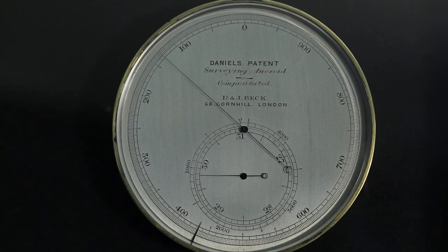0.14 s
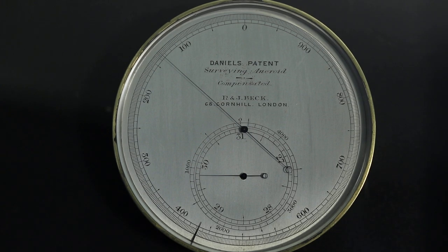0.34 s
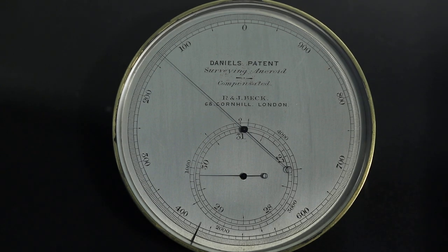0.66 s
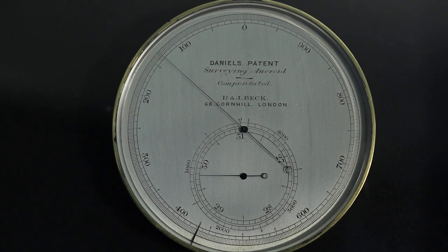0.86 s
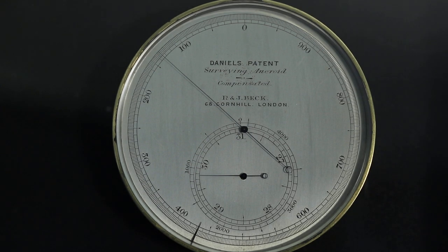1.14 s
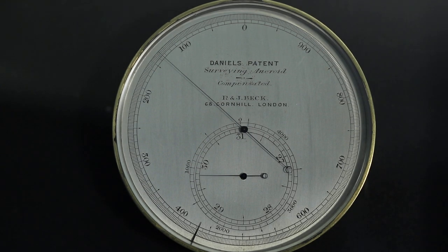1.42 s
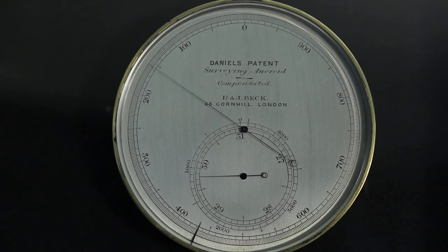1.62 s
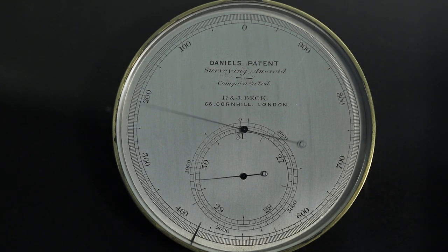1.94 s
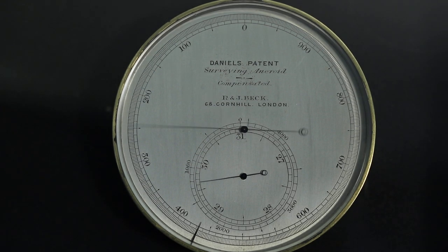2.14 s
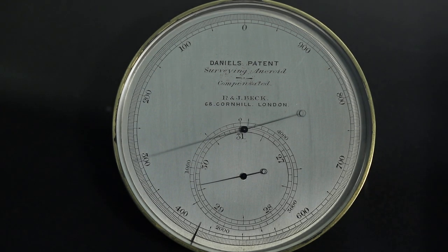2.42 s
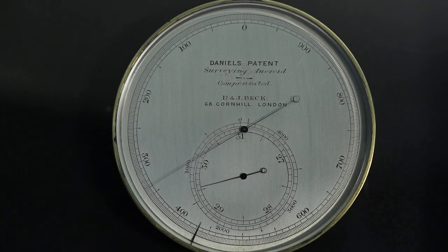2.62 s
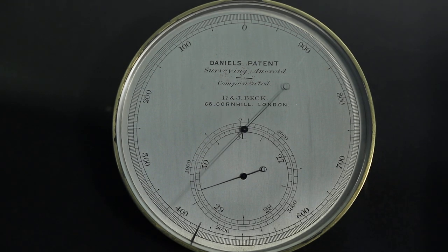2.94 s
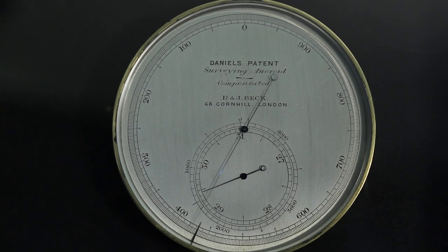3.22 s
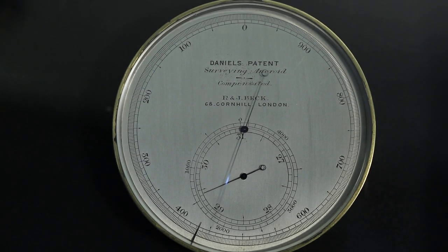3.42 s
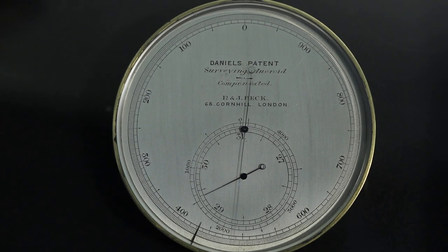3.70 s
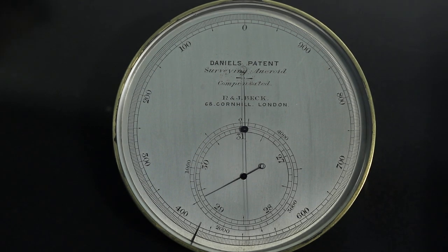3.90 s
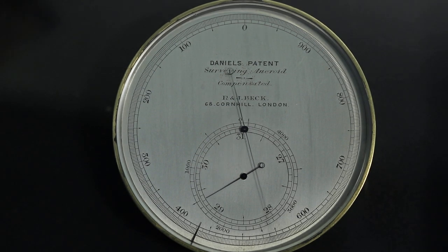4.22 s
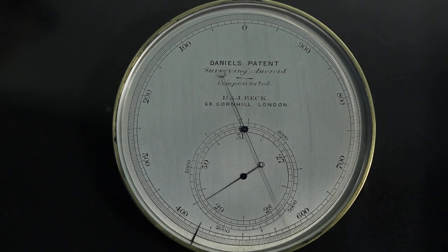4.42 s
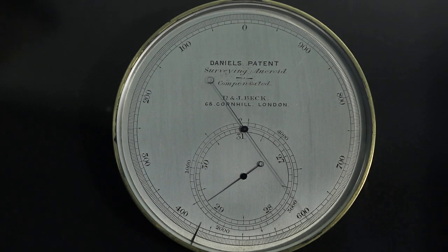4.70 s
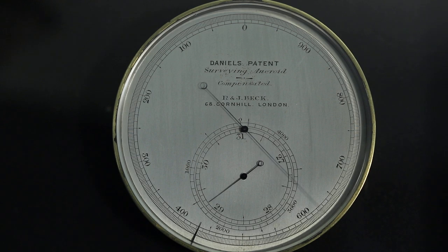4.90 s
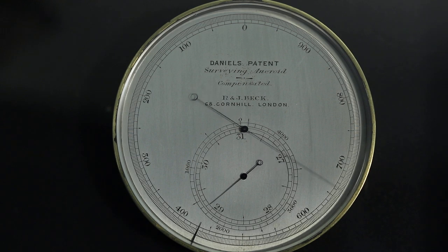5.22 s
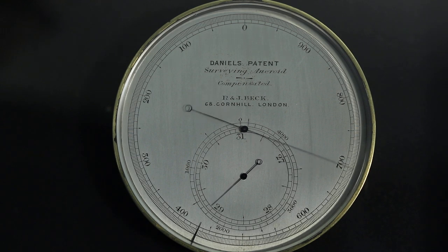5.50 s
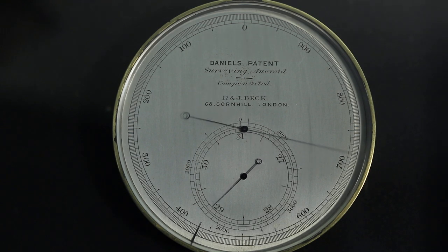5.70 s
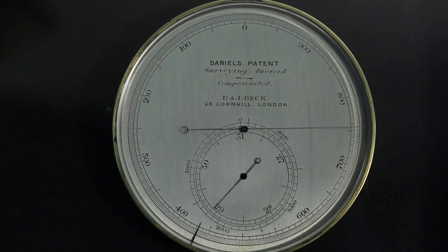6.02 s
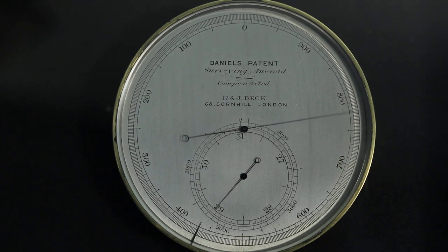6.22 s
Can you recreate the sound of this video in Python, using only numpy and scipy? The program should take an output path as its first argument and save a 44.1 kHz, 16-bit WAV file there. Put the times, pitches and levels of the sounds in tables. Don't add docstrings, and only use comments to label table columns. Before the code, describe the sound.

Near silence with soft room hiss, a tiny bright tick, then a faint dull knock. A very loud switch snap with a low thump starts a small electric vacuum pump close by. Its pitch sweeps up rapidly, rough and rattly, within about a second, then holds a hard, buzzing whine with airy rush until the end. Close stereo microphones in a small, lightly reverberant room.

```python
import sys
import numpy as np
from scipy import signal
from scipy.fft import irfft
from scipy.io import wavfile
from scipy.ndimage import uniform_filter1d

SR = 44100
rng = np.random.default_rng(int(sys.argv[2]) if len(sys.argv) > 2 else 0)


def level_to_linear(level):
    exponent = np.asarray(level, float) / 20
    return 10 ** exponent


def materialize(psi):
    bounded = np.clip(np.atleast_2d(psi).T, -1, 1)
    quanta = np.round(bounded * 32767).astype(np.int16)
    wavfile.write(sys.argv[1], SR, quanta)


N = 280035

# shaft order, multiple of the mains pulsation,
# left level/dB, right level/dB, left lead/rad
LOW_TONES = [(1, 0, -52, -53, 0.1), (0, 1, -48, -48, 0.1), (2, 0, -64, -64, 0.0), (1, 1, -53, -55, 0.2),
             (0, 2, -53, -55, 0.2), (4, 0, -29, -32, 0.2), (3, 1, -48, -52, 0.2), (6, -1, -49, -52, -0.2),
             (0, 5, -47, -50, 0.6), (7, 0, -48, -47, 1.1), (12, -4, -36, -39, 0.6), (8, 0, -23, -26, 0.1),
             (12, -3, -41, -44, 0.4), (8, 1, -49, -52, 0.4), (12, -2, -44, -42, 1.5),
             (11, -1, -45, -49, 1.2), (10, 0, -37, -42, 1.0), (12, -1, -33, -33, 1.3), (6, 0, -58, -58, 0)]
MID_TONES = [(11, 0, -48, -50, 0.2), (13, -1, -45, -45, 0.3), (12, 0, -21, -18, 0.3),
             (11, 1, -48, -53, 0.2), (13, 0, -36, -41, 1.0), (12, 1, -21, -27, 0.7), (14, 0, -45, -42, 0.6),
             (12, 2, -47, -44, -0.3), (16, 0, -31, -32, 1.2), (18, 0, -51, -49, 0.1),
             (20, 0, -40, -52, 2.1), (21, 0, -49, -62, -2.5), (24, -2, -47, -43, 2.2),
             (22, 0, -48, -56, 2.6), (24, 0, -43, -42, 2.1), (24, 1, -49, -54, 2.7), (28, 0, -36, -31, 2.1),
             (32, 0, -31, -35, 1.9)]
HIGH_TONES = [(35, 0, -48, -47, -3.0), (36, 0, -44, -45, 0.8), (37, 0, -48, -45, 2.9),
              (36, 1, -48, -54, -2.6), (40, 0, -35, -41, 0.7), (44, 0, -39, -37, -0.8),
              (47, 0, -47, -54, -2.4), (48, 0, -46, -51, 1.2), (49, 0, -45, -46, -2.6),
              (50, 0, -46, -49, -1.5), (55, 0, -47, -51, -1.6), (56, 0, -37, -34, -1.7),
              (58, 0, -47, -44, -2.3), (60, 0, -41, -41, -2.9), (64, 0, -44, -42, 2.8),
              (65, 0, -48, -56, 1.6), (71, 0, -51, -51, 1), (72, 0, -44, -49, 0.5), (127, 0, -51, -52, 1),
              (128, 0, -55, -56, 1)]
TONES = LOW_TONES + MID_TONES + HIGH_TONES
# f/Hz, bandwidth/Hz, lift/dB
HOUSING = [(450, 37, 5.5), (706, 70, 15), (1196, 20, 12), (1954, 42.4, 24.5), (3730, 210, -7.5),
           (4300, 440, 3.5), (5520, 240, 5), (11540, 310, 12)]

START = 1.438
FULL_TURNS = 91.15
LAG = 6 / SR


def pump():
    t = np.arange(round(START * SR), N) / SR
    flutter = rng.standard_normal(len(t))
    flutter = evened(uniform_filter1d(uniform_filter1d(flutter, 2500), 2500))
    speed = shaft(t) * (1 + .0001 * flutter)
    turns = np.cumsum(speed) / SR
    fade = np.clip((t - START) / 0.024, 0, 1)
    strong = ringing(tones(t, speed, turns), speed / np.median(speed))
    weak = room(comb(speed, turns))[:, :len(t)]
    sound = (strong + weak) * fade + rush(t, turns)
    return np.pad(sound, ((0, 0), (N - len(t), 0)))


def shaft(t):
    creep_from_s, creep_per_s = 4.863, .182
    # speed/(turns per s), time constant/s
    missing = [(66.93, .294), (21.2, .124)]
    since = np.maximum(t - START, 0)
    lag = sum(turns * np.exp(-since / tau) for turns, tau in missing)
    return FULL_TURNS + creep_per_s * np.maximum(t - creep_from_s, 0) - lag


def tones(t, speed, turns, wobble_db=0.45, strain_db=8, small_hz=380):
    pulsation_hz = 99.7
    ripple_db, turn_per_db = 4, .25
    shared_ripple = .9
    left_low_db, left_low_hz = 12, 950
    slow = slice(None, None, 128)
    shared, left, right = uniform_filter1d(uniform_filter1d(rng.standard_normal((3, 12000)), 18), 18)
    ripple = ripple_db * evened(np.array([shared + .8 * left, shared + .8 * right]))
    out, full = np.zeros((2, len(t))), np.median(speed)
    share = speed[slow] / full
    for order, side, left_db, right_db, lead in TONES:
        hz = order * speed[slow] + side * pulsation_hz
        full_hz = order * full + side * pulsation_hz
        high = min(order / 28, 1)
        moved = ripple[:, abs(hz).astype(int)] - ripple[:, [int(full_hz)]]
        sweeping = high * np.clip(10 * (1 - share), .2, 1)
        level = sweeping * shared_ripple * moved + path_db(hz) - path_db(full_hz)
        ahead = lead + 2 * np.pi * LAG * (hz - full_hz)
        ahead += turn_per_db * high * (moved[0] - moved[1])
        lean = [left_low_db / (1 + (f / left_low_hz) ** 4) for f in (hz, full_hz)]
        level += [[.5], [-.5]] * (lean[0] - lean[1])
        level += growth_db(order, side) * np.log10(share)
        radiated = np.clip((abs(hz) + 1) / min(full_hz, small_hz), .01, 1)
        level += 60 * np.log10(radiated) * (order > 4)
        level += 40 * np.log10(share) * (0 < order < 3)
        level += 9 * (1 - share) * (order == 0)
        wobble = evened(uniform_filter1d(rng.standard_normal((2, len(hz))), 30))
        level += wobble_db * wobble * (1 + order / 40)
        ragged = evened(uniform_filter1d(rng.standard_normal(len(hz)), 8)) * abs(1 - share)
        level += strain_db * np.minimum(ragged, .5) + [[left_db], [right_db]]
        phase = 2 * np.pi * (order * turns + side * pulsation_hz * t + rng.random())
        out[0] += np.interp(t, t[slow], level_to_linear(level[0])) * np.cos(phase + np.interp(t, t[slow], ahead))
        out[1] += np.interp(t, t[slow], level_to_linear(level[1])) * np.cos(phase)
    return np.sqrt(2) * out


def growth_db(order, side):
    slot_count, slot_order_db = 12, 37
    air_low_db, air_order_db = 55, 160
    far_side_db = 150
    if order < 3:
        return 0
    air = air_low_db + (air_order_db - air_low_db) * min(order / 28, 1)
    own = air if order % slot_count else slot_order_db
    return own + far_side_db * max(abs(side) - 1, 0)


def path_db(hz):
    # f/Hz, bandwidth/Hz, level/dB
    bench_peaks = [(352.7, 4.0, 5.5), (464.1, 72.0, 16.0), (602.8, 50.0, -9.0), (654.5, 35.0, 14.5),
                   (714.6, 102.0, 2.0), (722.4, 4.0, -16.5), (915.7, 22.0, 5.0), (1002.8, 16.0, -10.0),
                   (1071.0, 100.0, -18.0), (1082.3, 36.0, 14.0), (1125.9, 20.0, 1.5), (1158.7, 10.0, 4.5),
                   (1416.1, 64.0, 9.5), (1445.8, 12.0, -9.0)]
    shell_peaks = [(1964.4, 47.0, 9.0), (2252.6, 111.0, -12.0), (2509.6, 15.0, 8.5), (2762.4, 92.0, -12.5),
                   (2910.8, 7.0, -11.0), (2905.8, 131.0, 2.0), (3266.8, 51.0, -9.0), (3616.8, 20.0, -15.5),
                   (3811.2, 161.0, -18.0), (4899.6, 26.0, 9.0), (5023.7, 80.0, -8.5), (5112.1, 13.0, -5.0),
                   (5386.7, 252.0, 10.0), (5632.0, 70.0, -11.0)]
    wall_peaks = [(480, 90, -3.5), (680, 60, -4), (707.1, 3, -11), (948, 30, -8), (1235, 50, 8),
                  (2172, 30, 12), (2466, 15, -6), (3451, 200, -7.5), (3940, 90, -14), (4002, 8, -9),
                  (4620, 380, -16), (5065, 40, -6), (5113, 6, -10), (5350, 80, 4)]
    return bells_db(hz, bench_peaks + shell_peaks + wall_peaks)


def ringing(x, share, ring_db=0, width=22, smear_db=-3):
    kicked = x * np.clip(1.5 * (1 - share), 0, 1) ** .5
    out = level_to_linear(smear_db) * room(kicked.mean(0), t60=.4, wet_db=20)[:, :len(share)]
    for hz, _, db in HOUSING[:3]:
        mode = signal.lfilter(*signal.iirpeak(hz, hz / width, SR), kicked)
        out += level_to_linear(ring_db + db - 43.0) * mode
    return x + out


def comb(speed, turns, spread_db=4, rise_db=60):
    # f/Hz, level/dB
    weak_orders = [(500, -55), (1500, -52.5), (3000, -52), (6000, -54), (8000, -70), (12000, -63.5),
                   (13200, -56.5), (13700, -85), (15700, -67)]
    order, full = np.arange(1, 260), np.median(speed)
    level = spread_db * rng.standard_normal(len(order))
    strong = [k for k, side, *_ in TONES if side == 0]
    level[np.isin(order, strong)] = -60
    lines = np.zeros(4097, complex)
    lines[order] = level_to_linear(level) * np.exp(2j * np.pi * rng.random(len(order)))
    pattern = irfft(lines) * 4096 * np.sqrt(2)
    buzz = np.interp(turns % 1, np.arange(8192) / 8192, pattern)
    buzz *= level_to_linear(rise_db * np.log10(speed / full))
    hz = np.linspace(0, SR / 2, 1025)
    gain = level_to_linear(read(weak_orders, hz) + bells_db(hz, HOUSING)) * (hz < 16000)
    colour = signal.firwin2(2047, hz, gain, fs=SR)
    return signal.oaconvolve(buzz, colour, "same")


def rush(t, turns, patchy_db=1.0, chop=0.15, split_hz=1500):
    # f/Hz, density/(dB per Hz), left-right/dB, left-right coherence
    air_spectrum = [(30, -78, 15, .97), (100, -108, 17, .97), (191, -87.5, 1, 1), (333, -66.5, 6.5, 0.87),
                    (520, -72, 14, 0.88), (740, -65, 3, 1), (1330, -65, 4, 0.63), (2840, -70.5, -2, 0.21),
                    (4840, -69.5, 1.5, 0.14), (7000, -69, 3, 0.06), (9370, -76.5, 8.5, 0.076),
                    (12800, -82, 8, 0.2), (13500, -88, -12, 0.39), (15800, -93, -2, .5)]
    hz = np.fft.rfftfreq(1024, 1 / SR)
    rumble_db, hiss_db = run_up(np.arange(N // 256 + 5) * 256 / SR)
    column = hz[:, None]
    low = 1 / (1 + (column / split_hz) ** 2)
    low = low * np.clip(column / 90, 0, 1) ** 2
    level = low * rumble_db + (column > 90) * (1 - low) * hiss_db
    level += (read(air_spectrum, hz) + 0.69 * bells_db(hz, HOUSING))[:, None]
    patches = uniform_filter1d(rng.standard_normal(level.shape), 8, 0)
    level += patchy_db * evened(uniform_filter1d(patches, 14, 1))
    tilt = read(air_spectrum, hz, axis=2)[:, None] / 2
    gain = level_to_linear(np.array([level + tilt, level - tilt]) + 11.5)
    noise = hiss(gain, read(air_spectrum, hz, axis=3), LAG)
    beats = sum(np.cos(2 * np.pi * (k * turns + rng.random())) for k in range(2, 7))
    return noise[:, -len(t):] * (1 + chop * evened(beats) / 2)


def run_up(s):
    rumble_lift_db, strain_db, strain_slip = 3, 9.5, 0.0067
    shudder_turns, shudder_width, shudder_db = 38.5, 40, 9
    air_db, air_growth_db = 5, 55
    scrape_db, scrape_s, scrape_fall = 8.5, .1, 140
    spark_db, spark_fall = 31, 1650
    speed, since = shaft(s), np.maximum(s - START, 0)
    slip = np.maximum(1 - speed / FULL_TURNS, 0)
    rumble_db = rumble_lift_db + strain_db * slip / (slip + strain_slip)
    rumble_db += shudder_db * np.exp(-((speed - shudder_turns) / shudder_width * 2) ** 2)
    air = level_to_linear(air_db + air_growth_db * np.log10(speed / FULL_TURNS))
    scrape = level_to_linear(scrape_db - scrape_fall * np.maximum(since - scrape_s, 0))
    spark = level_to_linear(spark_db - spark_fall * since)
    return rumble_db, 10 * np.log10(air ** 2 + scrape ** 2 + spark ** 2)


def knocks():
    # t/s, peak level/dB, f/Hz, bandwidth/Hz, rise/s, t60/s
    impacts = [
        (.1362, -26.5, 7150, 7000, 0.00013, 0.0058),
        (.143, -45, 7000, 4000, .0003, .01),
        (.146, -41, 7000, 4000, .0005, .04),
        (.544, -40.5, 900, 2500, 0.003, 0.85),
        (.563, -42, 1200, 2500, 0.0011, .05),
        (1.448, -26.5, 104, 60, 0.049, 0.24),
        (1.45, -29.5, 200, 60, .03, .5),
        (2.02, -46, 62, 40, .05, .3),
    ]
    snap_parts = [
        (1.4372, -1, 8500, 9000, .0022, .013),
        (1.4378, -5, 3900, 900, .002, .02),
        (1.438, -13, 2000, 300, .002, .03),
        (1.438, -14, 1050, 300, .003, .035),
    ]
    out, t = np.zeros(N), np.arange(14000) / SR
    for s, db, hz, width, rise, t60 in impacts + snap_parts:
        edges = np.clip([hz - width / 2, hz + width / 2], 40, 16000)
        band = signal.butter(2, edges, "band", fs=SR, output="sos")
        burst = signal.sosfilt(band, rng.standard_normal(len(t)))
        burst *= level_to_linear(-60 * np.maximum(t - rise, 0) / t60) * np.clip(t / rise, 0, 1) ** 2
        out[round(s * SR):][:len(t)] += level_to_linear(db) * burst / abs(burst).max()
    return room(out, t60=.3, wet_db=-13)


def floor():
    # f/Hz, density/(dB per Hz)
    tone_spectrum = [(15, -35), (30, -11), (150, -6.5), (300, -8), (600, -10), (1200, -13), (2500, -16.5),
                     (5000, -18), (9000, -25), (13000, -30), (15600, -36), (16000, -58)]
    # f/Hz, left-right coherence
    coherence = [(60, 0.19), (240, 0.34), (950, 0.11), (3770, 0.12), (15000, 0.057)]
    hz = np.fft.rfftfreq(1024, 1 / SR)
    noise = hiss(level_to_linear(read(tone_spectrum, hz))[:, None], read(coherence, hz), 0)
    return level_to_linear(-55) * evened(noise)


def room(x, t60=0.36, wet_db=-3):
    t = np.arange(SR // 2) / SR
    taps = rng.standard_normal((2, len(t))) * (rng.random((2, len(t))) < .08)
    taps *= (t > .002) * level_to_linear(-60 * t / t60)
    taps *= level_to_linear(wet_db) / np.linalg.norm(taps[0])
    taps[0, 0], taps[1, round(LAG * SR)] = 1, 1
    return signal.fftconvolve(x[None], taps / np.linalg.norm(taps[0]), axes=1)[:, :N]


def hiss(gain, same, lag):
    hz = np.fft.rfftfreq(1024, 1 / SR)[:, None]
    a, b, c, d = rng.standard_normal((N // 256 + 5, 513, 4)).T
    same = np.clip(same, -1, 1)[:, None]
    left, other = a + 1j * b, c + 1j * d
    right = same * left * np.exp(-2j * np.pi * hz * lag) + np.sqrt(1 - same ** 2) * other
    return signal.istft(np.array([left, right]) * gain, nperseg=1024, noverlap=768)[1][:, :N]


def bells_db(hz, peaks):
    return sum(db / (1 + (2 * (abs(hz) - f) / width) ** 2) for f, width, db in peaks)


def read(points, hz, axis=1):
    table = np.transpose(points)
    return np.interp(np.log(hz + 1), np.log(table[0] + 1), table[axis])


def evened(x):
    return x / np.sqrt(np.mean(x ** 2) + 1e-20)


def scene():
    return pump() + knocks() + floor()


def band_limit(x):
    return signal.sosfilt(signal.butter(12, 15650, fs=SR, output="sos"), x)


def record(dry):
    mix = np.clip(dry, -1, 1)
    return band_limit(mix)


dry = scene()
out = record(dry)
materialize(out)
```